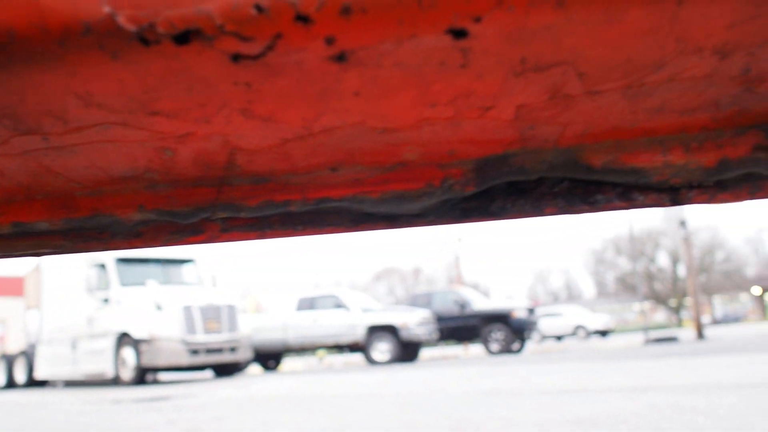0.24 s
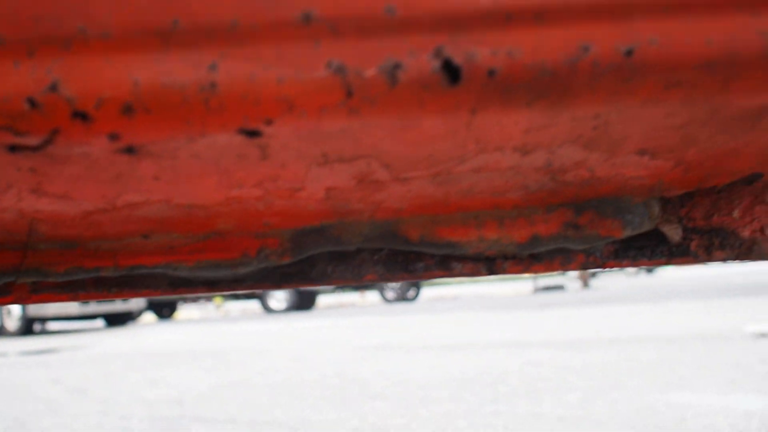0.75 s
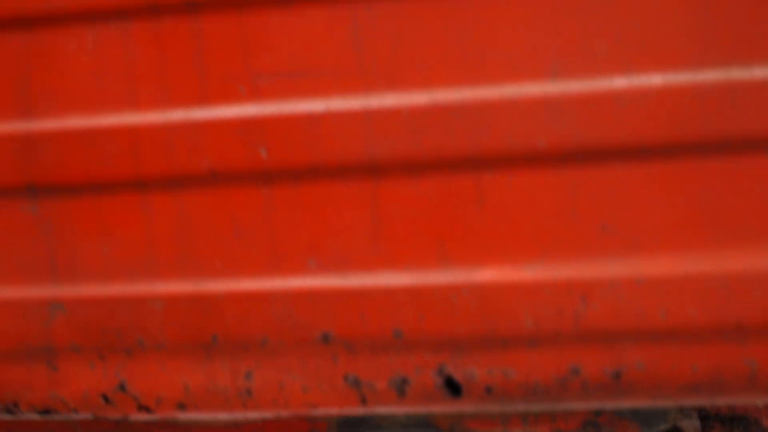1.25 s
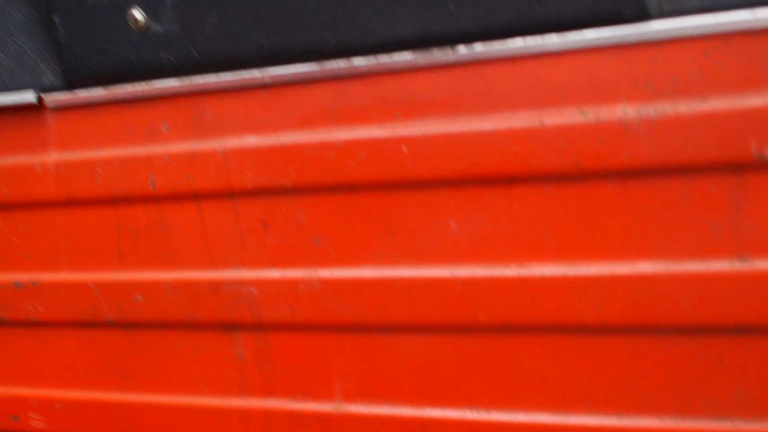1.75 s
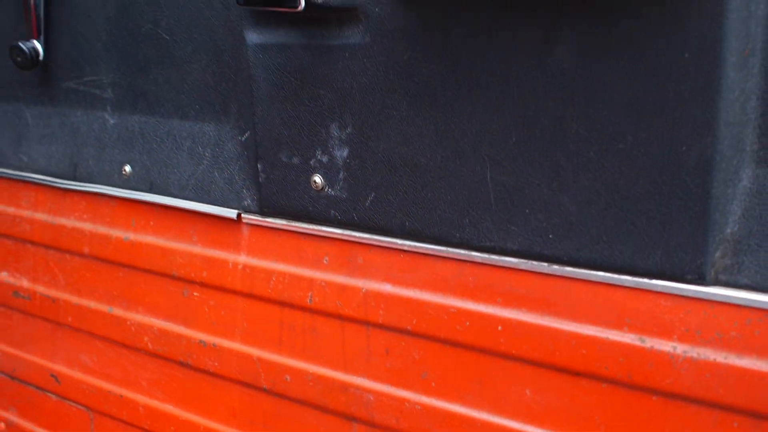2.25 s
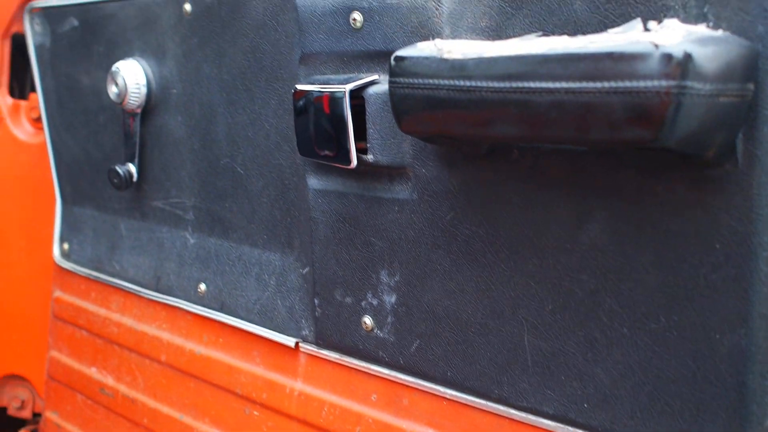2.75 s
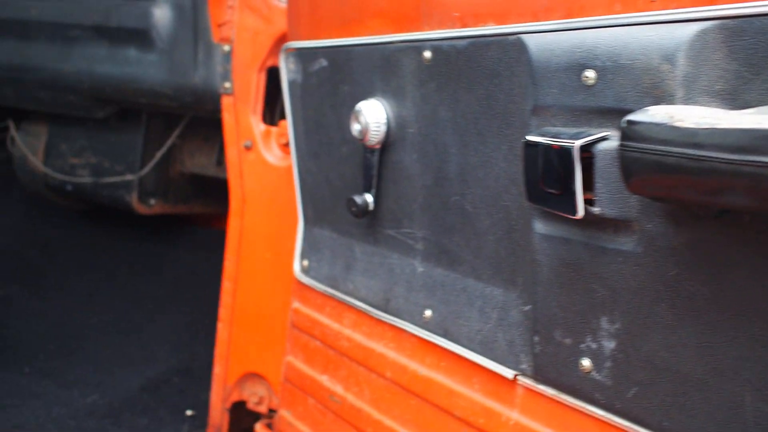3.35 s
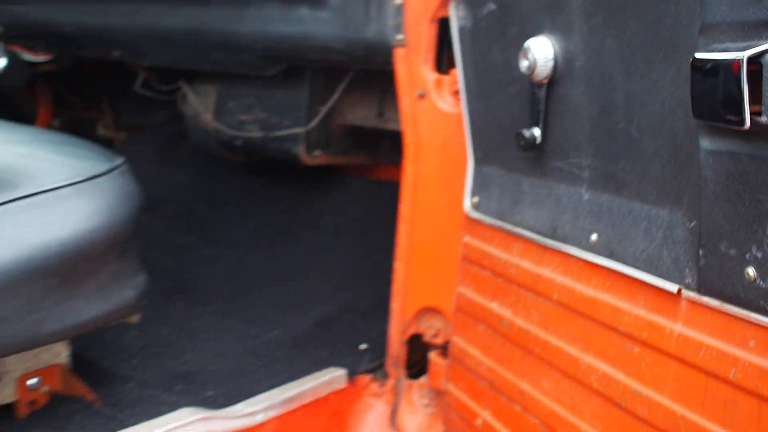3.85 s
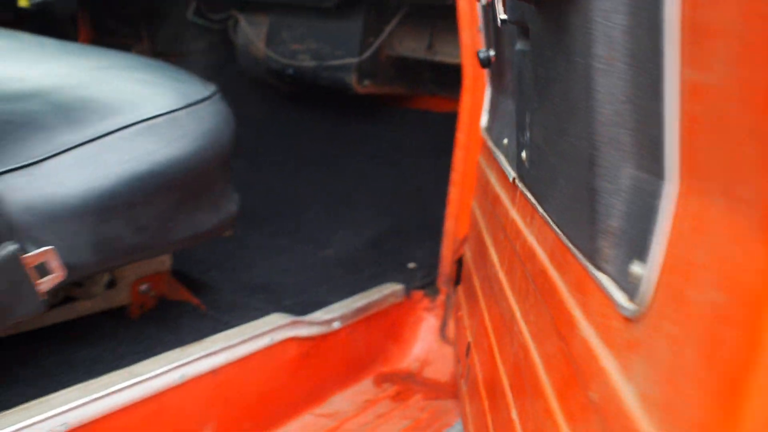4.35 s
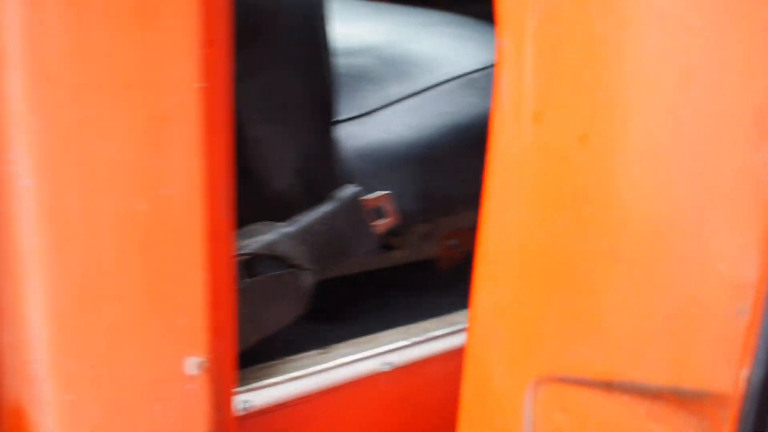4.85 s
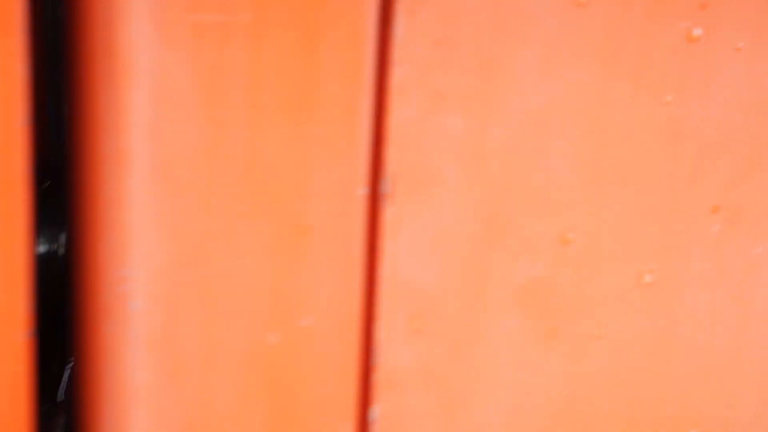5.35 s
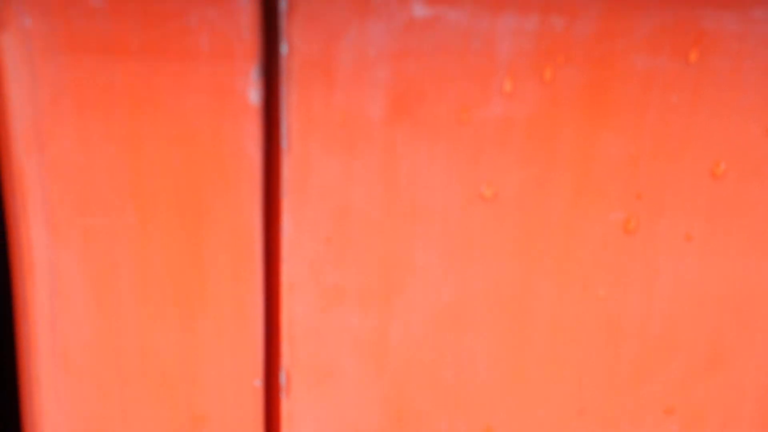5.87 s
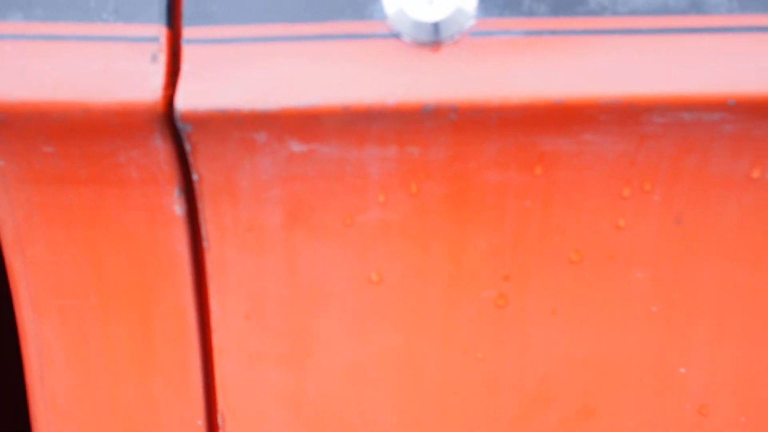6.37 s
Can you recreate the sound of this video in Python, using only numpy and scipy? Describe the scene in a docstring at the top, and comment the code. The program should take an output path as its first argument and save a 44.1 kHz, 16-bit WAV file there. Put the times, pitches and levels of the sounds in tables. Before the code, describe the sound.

Outdoors beside an old parked pickup, a big V8 idles with a low, uneven burble, soft mechanical clatter and airy fan hiss. Faint belt chirps come early. The door latch clicks, then clacks harder, and later the door slams with a bright metal crash, low boom and fading rattle. The engine seems to duck sharply, then creeps back. Close stereo microphone moving past the open door.

```python
"""A large V8 engine idles in a parked pickup, heard by a listener moving past the open door.
Its two exhaust banks burble as firing pulses ring the pipes, over shaped noise from the engine bay.
The latch clicks twice; then the door slams with a metal crash, a boom and light rattling taps.
A belt chirps faintly. After the two loudest blows the engine is heard more faintly for a while,
as the level it is heard at drops and creeps back; the engine itself runs on unchanged."""
import sys
import numpy as np
from scipy import signal
from scipy.fft import rfft, irfft, next_fast_len
from scipy.io import wavfile
from scipy.ndimage import uniform_filter1d

SR = 44100
rng = np.random.default_rng(int(sys.argv[2]) if len(sys.argv) > 2 else 0)


def store_wav(level_fs):
    """Save 16-bit WAV to argv[1]."""
    pcm = np.round(np.clip(np.atleast_2d(level_fs), -1, 1) * 32767)
    wavfile.write(sys.argv[1], SR, pcm.T.astype(np.int16))


N = 291501  # length in samples
TIME = np.arange(N) / SR  # seconds

# Engine speed, wandering about idle. Each row: time in seconds, four-stroke cycles per second.
ENGINE_SPEED = [(0.0, 8.905), (0.75, 8.823), (1.0, 8.833), (1.25, 8.9), (1.75, 8.675), (2.0, 8.635),
                (2.25, 8.8), (2.5, 8.817), (3.0, 8.682), (3.25, 8.758), (3.75, 8.793), (4.25, 8.704),
                (5.0, 8.945), (5.5, 8.7), (5.75, 8.791), (6.0, 8.755), (6.25, 8.62), (6.61, 8.75)]
# Cylinders in firing order. Each row: crank angle in degrees, average pulse in dB,
# swell of the muffler shell's ring in dB, swell of the hiss in dB.
CYLINDERS = [(70.87, 4, 4.5, 1.2), (145.8, -0.5, 3, 3), (243.4, 2, -2.5, 2), (331.4, 3.45, 2, 2.5),
             (428.96, 2.5, 0.5, 2.5), (516.7, 4.5, -3.5, 0.5), (605.2, 1.5, 0.5, 0.9), (699.6, 4.5, 1.5, 2)]
# The exhaust bank (L or R) of each firing: a cross-plane crank fires each bank unevenly.
CYLINDER_BANK = np.array(list("LLRLRRLR"))
# Exhaust resonances. Each row: pitch in Hz, width in Hz, signed strength in the left pipe, in the right.
PIPE_RESONANCES = [(77.5, 15.6, -0.12, -0.58), (89, 27.3, 0.26, 0.82), (125.3, 20.7, 0.32, -0.47),
                   (174.7, 8.1, 0.65, -1.12), (188.3, 39.8, -0.125, 0.164), (259.1, 10.55, 0.13, -0.66),
                   (265.6, 12.7, -0.35, 0.53), (316.3, 10.8, -0.0011, 0.018), (350, 17.4, 0.022, 0.0087)]
# Muffler shell. Each row: pitch in Hz, width in Hz, relative strength in dB.
MUFFLER_SHELL = [(464.5, 54, 4), (534.6, 24, 8.5), (604.8, 28, 11.5)]
# Engine covers. Each row: pitch in Hz, width in Hz, relative strength in dB.
ENGINE_COVERS = [(815.4, 26, 4), (912, 33, -7), (1275, 15, 2), (1322, 27, -8), (1534, 10, 1.5),
                 (1830, 41, -6)]
# Exhaust levels as the listener moves, before surges and dips. Each row: time in seconds, throb in dB,
# drone in dB, growl in dB, upper tones in dB against the growl.
EXHAUST_LEVELS = [(0, -22.5, -14, -21, -4), (.75, -21.5, -13.8, -19.8, -6), (1.1, -21, -13, -22.5, -7),
                  (1.45, -17.5, -11.5, -21.5, -7.5), (1.8, -18, -10.3, -24.5, -2),
                  (2.15, -18, -12, -21.5, -5), (2.5, -17.5, -14, -23, 2), (2.87, -18.5, -12, -20.5, -1.5),
                  (3.2, -18, -13, -21, -2.5), (3.75, -16.5, -15, -17, -3.5),
                  (4.35, -18.5, -13.5, -16.5, -7), (4.65, -18.5, -15, -15, -10),
                  (5.2, -21, -12, -17.5, -12.5), (5.45, -21.5, -16, -18.5, -9), (6.0, -20, -17.4, -21, -6),
                  (6.6, -20, -15, -17, -9.5)]
# Levels from under the bonnet, screened as the door swings shut, before swells and dips.
# Each row: time in seconds, shell ring in dB, clatter in dB, hiss in dB.
BAY_LEVELS = [(0, -27.5, -28, -33.5), (1.5, -27, -27, -32), (3.8, -27, -28, -31), (5.2, -32.5, -32, -36.5),
              (6.6, -29, -31.5, -38)]
# Surge once a cycle. Each row: time in seconds, rise and fall about the mean in dB.
SURGE_DEPTH = [(0, 1.5), (2.5, 0.5), (4.3, 4.4), (6.6, 5)]
# Turbulent exhaust flow under the firing tones. Each row: pitch in Hz, relative level in dB.
FLOW_SPECTRUM = [(25, -28), (50, -23), (100, -20), (180, -6), (300, -13.5), (420, -18.5), (650, -25.5),
                 (740, -39), (900, -61)]
# Valve gear and belts. Each row: pitch in Hz, relative level in dB.
CLATTER_SPECTRUM = [(440, -37), (750, -13), (812, -1.5), (931, 3.5), (1160, -1.5), (1270, -0.5),
                    (1410, -1.5), (1870, -3), (2300, -18), (2990, -59), (5060, -120)]
# Fan and intake air. Each row: pitch in Hz, relative level in dB.
HISS_SPECTRUM = [(1350, -12.5), (2300, -3), (3050, -3.5), (3250, -2.5), (4380, -7), (6460, -8),
                 (7770, -5.5), (8770, -7.5), (10400, -19), (11600, -14), (13400, -20.5), (14600, -19),
                 (15800, -26)]
# Likeness of noise at the two ports. Each row: pitch in Hz, likeness (1 same, 0 unrelated, -1 opposite).
PORT_LIKENESS = [(60, 0.94), (130, 0.98), (290, 0.98), (640, 0.95), (1410, 0.99), (3100, 0.92),
                 (6820, 0.18), (15000, -0.51)]
# Lead of the left microphone port for close sounds. Each row: pitch in Hz, lead in radians.
LEFT_LEAD = [(0, 0), (4300, .2), (8000, .8), (15000, 1.3)]
# Balance of the ports. Each row: pitch in Hz, left minus right in dB.
LEFT_LEAN = [(2380, 0.0), (4400, 0.5), (8120, 0.5), (15000, 3.5)]
# Blows on latch and striker. Each row: start in seconds, level in dB, strongest ring in Hz,
# bright crack in dB against the blow, seconds to fade by 60 dB.
LATCH_BLOWS = [(2.4717, -10.5, 5300, -1, 0.0096), (2.8892, -2.5, 2940, -16, 0.013),
               (5.203, -19.5, 1700, 2, 0.039), (5.2134, -5.5, 1670, 9, 0.018),
               (5.2253, -10, 1880, 4, 0.052), (5.2384, -15.5, 2580, 7, 0.084),
               (5.2618, -10, 2020, -14, 0.027), (5.288, -9, 2690, -12, 0.032),
               (5.3128, -23, 2540, -17, 0.041), (5.335, -26, 3110, -18, 0.03),
               (5.3616, -24.5, 2460, -14, 0.03), (6.281, -33, 2640, 6.5, 0.023)]
# Ring of the latch before chance scatter. Each row: pitch in Hz, relative level in dB,
# seconds to fade by 60 dB.
LATCH_MODES = [(1110, -18, .1), (1547, -4.5, 0.19), (1804, -12, 0.22), (2570, -14, 0.29), (3044, 3, 0.094),
               (3820, -8, 0.11), (4600, -11, 0.11), (5330, -7, 0.068), (6730, -11, 0.1), (7440, -11, .05),
               (8540, -15, .05)]
# Stray taps of the loose door rod. Each row: start in seconds, level in dB.
STRAY_TAPS = [(5.4204, -31), (5.686, -32.5), (5.798, -33), (5.818, -27.5), (5.847, -36), (5.87, -25.5)]
# Ring of the rod before chance scatter. Each row: pitch in Hz, relative level in dB,
# seconds to fade by 60 dB.
ROD_MODES = [(2540, -0.5, .02), (3120, 1, 0.021), (3680, -2, 0.011), (5270, -7, .012)]
# Sheet metal crash. Each row: pitch in Hz, relative level in dB.
CRASH_SPECTRUM = [(290, -34), (500, 5.5), (658, -22), (958, 2.5), (1340, -6), (1840, 1), (2210, -18),
                  (2600, -10), (6000, -17.5), (8490, -1.5), (15800, -55)]
# Door skin. Each row: pitch in Hz, width in Hz, relative strength in dB.
DOOR_SKIN = [(149, 19, -16), (213, 20, 8), (282.5, 19, 3.5), (360, 27, 1.5), (426, 28, -6)]
# Belt chirps. Each row: centre in seconds, level in dB.
BELT_CHIRPS = [(0.31, -36), (.65, -38), (.76, -37), (0.873, -33), (0.99, -37), (1.211, -35), (1.56, -31),
               (1.68, -35), (2.7, -32), (3.14, -33.5)]
# Dips in the level at which the engine is heard. Each row: start in seconds, depth in dB.
LEVEL_DIPS = [(2.89, 3.5), (5.21, 15.5)]

DIP_FALL_S, DIP_HOLD_S, DIP_RECOVER_DB_PER_S = 0.073, 0.072, 6.5
FLOW_DB = -10.5  # flow noise against the growl
# surge depth in dB above which the drone joins in; share of the cycle at the crest of growl and of drone
DRONE_JOINS_DB, GROWL_CREST, DRONE_CREST = 4.2, 0.4, 0.1
SLAM_S, CRASH_DB, CRASH_T60_S = 5.213, -10, 0.33
BOOM_RISE_S, BOOM_DB, BOOM_T60_S = 0.075, -10, 0.37
# taps at each shudder of the slammed door: first start, average gap, timing scatter, count
SHUDDER_S, SHUDDER_GAP_S, SHUDDER_SCATTER_S, SHUDDERS = 5.3842, 0.0227, 0.001, 9
SHUDDER_DB, SHUDDER_STEP_DB, SHUDDER_SPREAD_DB = -28.5, -0.6, 1.5  # first average, step per tap, scatter
CHIRP_HZ = 3270
KNEE = 0.7  # peaks above this are rounded off
EDGE_HZ = 16050  # upper band limit


def gain_of(db):
    """Turns decibels into a multiplier."""
    return 10 ** (np.asarray(db) / 20)


def evened(x):
    """Scales a sound to an average (RMS) strength of one."""
    return x / np.sqrt(np.mean(x ** 2) + 1e-20)


def read(points, hz):
    """Reads a table between its rows, evenly by musical interval."""
    f, value = np.transpose(points)
    return np.interp(np.log(hz + 1), np.log(f + 1), value)


def over_time(table):
    """Draws each column of a timed table as a line over the whole sound."""
    s, *columns = np.transpose(table)
    return [np.interp(TIME, s, column) for column in columns]


def add(mix, s, sound):
    """Adds a sound into the mix from the given second."""
    part = mix[..., round(s * SR):][..., :sound.shape[-1]]
    part += sound[..., :part.shape[-1]]


def resonate(x, modes):
    """Passes x through a sum of resonances given as (Hz, width Hz, gain)."""
    size = next_fast_len(len(x) + SR // 4)
    hz = np.fft.rfftfreq(size, 1 / SR)
    response = sum(g / (1 + 2j * (hz - f) / w) for f, w, g in modes)
    return irfft(rfft(x, size) * response, size)[:len(x)]


def resonate_db(x, table):
    """Passes x through resonances whose strengths are in dB."""
    return resonate(x, [(f, w, gain_of(db)) for f, w, db in table])


def band(x, lo_hz, hi_hz, order=4):
    """Keeps one band of pitches and evens its strength."""
    sos = signal.butter(order, [lo_hz, hi_hz], "bandpass", fs=SR, output="sos")
    return evened(signal.sosfiltfilt(sos, x))


def noise(spectrum, patchy_db):
    """Diffuse noise at the two ports, with drifting patches of level."""
    frames, hz = N // 256 + 5, np.fft.rfftfreq(1024, 1 / SR)
    a, b, c, d, patches = rng.standard_normal((frames, 513, 5)).T
    patches = uniform_filter1d(patches, size=10, axis=0)
    patches = evened(uniform_filter1d(patches, size=12, axis=1))
    same = np.clip(read(PORT_LIKENESS, hz), -1, 1)[:, None]
    left = a + 1j * b
    right = same * left + np.sqrt(1 - same ** 2) * (c + 1j * d)
    right = right * gain_of(-read(LEFT_LEAN, hz))[:, None]
    level = gain_of(read(spectrum, hz)[:, None] + patchy_db * patches)
    both = np.array([left, right]) * level
    return evened(signal.istft(both, nperseg=1024, noverlap=768)[1][:, :N])


def ports(x):
    """A close sound reaches the right port with a phase lag that grows with pitch."""
    hz = np.fft.rfftfreq(N, 1 / SR)
    to_right = np.exp(-1j * read(LEFT_LEAD, hz)) * gain_of(-read(LEFT_LEAN, hz))
    return np.array([x, irfft(rfft(x) * to_right, N)])


def struck(modes, length_s, spread):
    """A blow starts every mode at a chance phase, strength and slight detuning; each dies away."""
    t = np.arange(round(length_s * SR)) / SR
    luck = rng.random((len(modes), 3))
    ring = np.zeros(len(t))
    for (f, db, t60), (strength, tuning, phase) in zip(modes, luck):
        fade = gain_of(db + spread * (strength - 2.5) - 60 * t / t60)
        ring += fade * np.sin(2 * np.pi * (f * (0.98 + 0.0373 * tuning) * t + phase))
    return ring


def softened(x, rise_s=0.00058):
    """A contact takes a moment to build its force."""
    return x * np.minimum(np.arange(len(x)) / SR / rise_s, 1)


def belt(length_s=0.06):
    """A slipping belt gives short fuzzy whistles: noise through one narrow resonance."""
    out, size = np.zeros(N), round(length_s * SR)
    for s, db in BELT_CHIRPS:
        whistle = evened(resonate(rng.standard_normal(size), [(CHIRP_HZ, 70, 1)]))
        add(out, s - length_s / 2, gain_of(db) * np.hanning(size) * whistle)
    return out


def rattle():
    """A loose rod taps at each shudder of the slammed door, softer on average, plus stray taps."""
    out, t, k = np.zeros(N), np.arange(SR // 25) / SR, np.arange(SHUDDERS)
    late, strong = rng.standard_normal((SHUDDERS, 2)).T
    starts = SHUDDER_S + SHUDDER_GAP_S * k + SHUDDER_SCATTER_S * late
    levels = SHUDDER_DB + SHUDDER_STEP_DB * k + SHUDDER_SPREAD_DB * strong
    for s, db in list(zip(starts, levels)) + STRAY_TAPS:
        tick = evened(resonate(rng.standard_normal(len(t)), [(5000, 3000, 1)]))
        tick = 0.19 * tick * gain_of(-60 * t / 0.0085)
        knock = evened(resonate(rng.standard_normal(len(t)), [(3000, 1500, 1)]))
        knock = 0.36 * knock * gain_of(-60 * t / 0.016)
        add(out, s, gain_of(db) * softened(struck(ROD_MODES, 1 / 25, 2.8) + tick + knock))
    return out


def latch(ring_db=-12, scrape=0.6):
    """Each blow is a bright crack and a short strong ring over the modes of the latch."""
    out, t = np.zeros(N), np.arange(SR // 5) / SR
    bright = signal.butter(1, [4500, 8500], "bandpass", fs=SR, output="sos")
    for s, db, hz, treble_db, t60 in LATCH_BLOWS:
        crack = gain_of(treble_db - 60 * t / t60) * signal.sosfilt(bright, rng.standard_normal(len(t)))
        # loose parts chatter
        buzz = 1 + 1.45 * evened(uniform_filter1d(rng.standard_normal(len(t)), size=60))
        grit = evened(resonate(rng.standard_normal(len(t)), [(hz, 1400, 1)]))
        knock = gain_of(-60 * t / t60) * (np.sin(2 * np.pi * hz * t) + scrape * grit)
        ring = gain_of(ring_db) * buzz * struck(LATCH_MODES, 1 / 5, 2.26)
        add(out, s, gain_of(db) * softened(knock + crack + ring))
    return out


def crash():
    """Sheet metal crashes as noise that dies away, its treble first."""
    hz, t, z = signal.stft(noise(CRASH_SPECTRUM, 2.5), SR, nperseg=256)
    t60 = CRASH_T60_S / (1 + (hz[:, None] / 8000) ** 2)
    z = z * gain_of(CRASH_DB - 60 * np.maximum(t - SLAM_S, 0) / t60)
    return (TIME > SLAM_S) * signal.istft(z, SR, nperseg=256)[1][:, :N]


def boom():
    """The door skin booms low as the seal is squeezed: resonant noise that rises, then fades."""
    skin = evened(resonate_db(rng.standard_normal(N), DOOR_SKIN))
    since = TIME - SLAM_S
    rise = np.clip(since / BOOM_RISE_S, 0, 1)
    fade = gain_of(BOOM_DB - 60 * np.maximum(since - BOOM_RISE_S, 0) / BOOM_T60_S)
    return rise * fade * skin


def level_dips():
    """The level at which the engine is heard drops quickly, holds, and creeps back at a steady rate."""
    lost_db = np.zeros(N)
    for s, depth_db in LEVEL_DIPS:
        fall = depth_db * np.clip((TIME - s) / DIP_FALL_S, 0, 1)
        recovery = DIP_RECOVER_DB_PER_S * np.maximum(TIME - s - DIP_FALL_S - DIP_HOLD_S, 0)
        lost_db += np.maximum(fall - recovery, 0)
    return gain_of(-lost_db)


def firing_angle():
    """Crank angle of each firing in degrees; two crank turns make one cycle."""
    return np.transpose(CYLINDERS)[0]


def swell(cycles, db):
    """Each cylinder sets its own level, reached 45 crank degrees after its listed firing angle."""
    return gain_of(np.interp(cycles % 1 * 720, firing_angle() + 45, db, period=720))


def bay(cycles, knocks):
    """Under the bonnet, firing knocks and noise ring shell and covers, amid clatter and air hiss."""
    _, _, ring_db, hiss_db = np.transpose(CYLINDERS)
    ring, clatter, hiss = map(gain_of, over_time(BAY_LEVELS))
    drive = swell(cycles, ring_db) * (1.1 * evened(knocks) + rng.standard_normal(N))
    shell = band(resonate_db(drive, MUFFLER_SHELL), 325, 683)
    covers = evened(resonate_db(0.63 * evened(knocks) + rng.standard_normal(N), ENGINE_COVERS))
    rattling = clatter * (noise(CLATTER_SPECTRUM, 1.16) + 0.46 * covers)
    air = hiss * swell(cycles, hiss_db) * noise(HISS_SPECTRUM, 1.44)
    return ring * shell + rattling + air


def firing(cycles, uneven_db=0.6, late_s=0.00007):
    """Each firing sends a pulse of slightly chance size and timing into its bank's pipe."""
    pulse_db = np.transpose(CYLINDERS)[1]
    turn = np.arange(-1, int(cycles[-1]) + 1)[:, None] + firing_angle() / 720
    chance = rng.standard_normal(turn.shape + (2,))
    lead = SR // 4  # start early, so the pipes already ring when the sound begins
    known_cycles = np.r_[-ENGINE_SPEED[0][1] / 4, cycles]
    at = np.interp(turn, known_cycles, np.r_[-1 / 4, TIME], right=np.nan) + late_s * chance[..., 0]
    size = gain_of(pulse_db + uneven_db * chance[..., 1])
    exhaust, knocks = np.zeros(N + lead), np.zeros(N)
    for column, side in enumerate("LR"):
        pulses = np.zeros(N + lead + SR)
        fires = (CYLINDER_BANK == side) & np.isfinite(at)
        pulses[np.round(at[fires] * SR).astype(int) + lead] = size[fires]
        pipe = [(row[0], row[1], row[2 + column]) for row in PIPE_RESONANCES]
        exhaust += resonate(pulses[:N + lead], pipe)
        knocks += pulses[lead:N + lead]
    return exhaust[lead:], knocks


def burble(cycles, exhaust):
    """Pipe tones are split into throb, drone and growl, surging once a cycle over flow noise."""
    throb, drone, growl, rasp = map(gain_of, over_time(EXHAUST_LEVELS))
    surge_db = over_time(SURGE_DEPTH)[0]
    surge = np.cos(2 * np.pi * (cycles - GROWL_CREST))
    growl = growl * gain_of(surge_db * surge)
    drone_surge = np.cos(2 * np.pi * (cycles - DRONE_CREST))
    drone = drone * gain_of(2 * np.maximum(surge_db - DRONE_JOINS_DB, 0) * drone_surge)
    upper = 0.79 * band(exhaust, 299.7, 332.5, order=2) + band(exhaust, 337.4, 373.3, order=2)
    upper = gain_of(2.0 * surge) * evened(upper)
    low_tones = throb * band(exhaust, 52, 132) + drone * band(exhaust, 129.4, 217)
    growl_tones = growl * (0.71 * band(exhaust, 241, 280.8) + rasp * upper)
    flow = growl * gain_of(FLOW_DB) * noise(FLOW_SPECTRUM, 0.29)
    return low_tones + growl_tones + flow


def engine():
    """Crank rotation times the firings that drive both the exhaust and the engine-bay sounds."""
    cycles = np.cumsum(over_time(ENGINE_SPEED)[0]) / SR
    exhaust, knocks = firing(cycles)
    return level_dips() * (bay(cycles, knocks) + burble(cycles, exhaust))


def scene():
    """Belt, rattle, latch, slam and engine at the two ports."""
    return ports(belt() + rattle() + latch()) + crash() + boom() + engine()


def record(dry):
    """The microphone drops the deepest bass, peaks round off towards full scale, then the band limit."""
    cut = signal.sosfilt(signal.butter(2, 35, "highpass", fs=SR, output="sos"), dry)
    over = np.maximum(abs(cut) - KNEE, 0)
    bent = np.sign(cut) * (1 - KNEE) * np.tanh(over / (1 - KNEE))
    rounded = np.clip(cut, -KNEE, KNEE) + bent
    lowpass = signal.firwin(511, EDGE_HZ, window=("kaiser", 9), fs=SR)
    return signal.oaconvolve(rounded, lowpass[None], "same")


dry = scene()
out = record(dry)
store_wav(out)
```